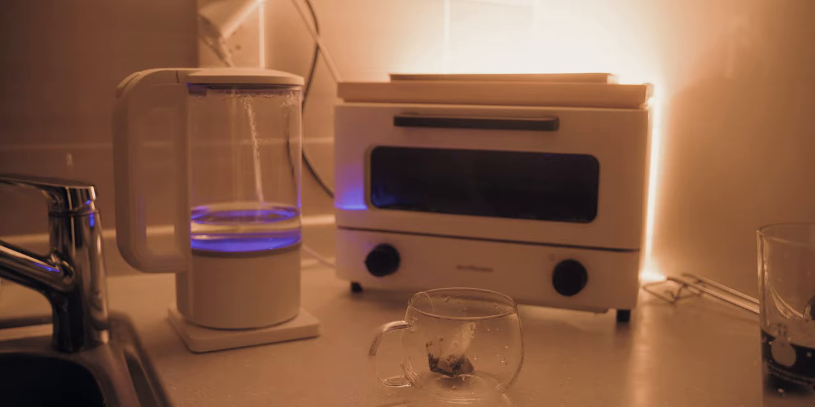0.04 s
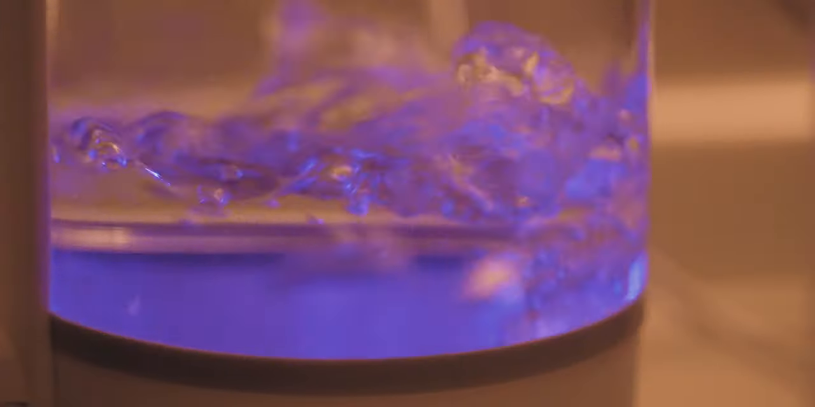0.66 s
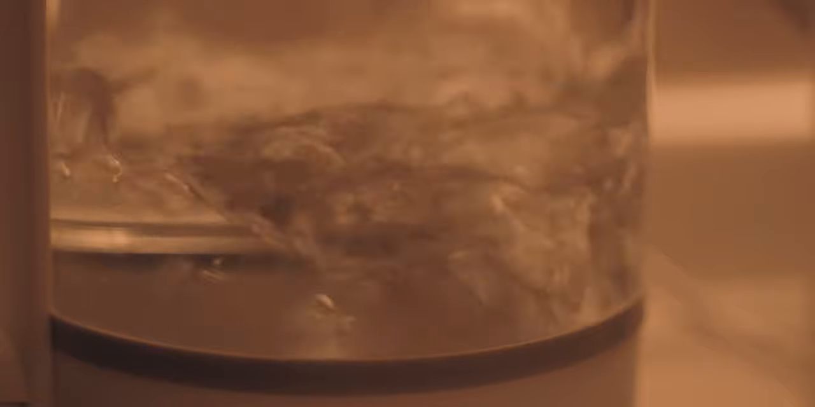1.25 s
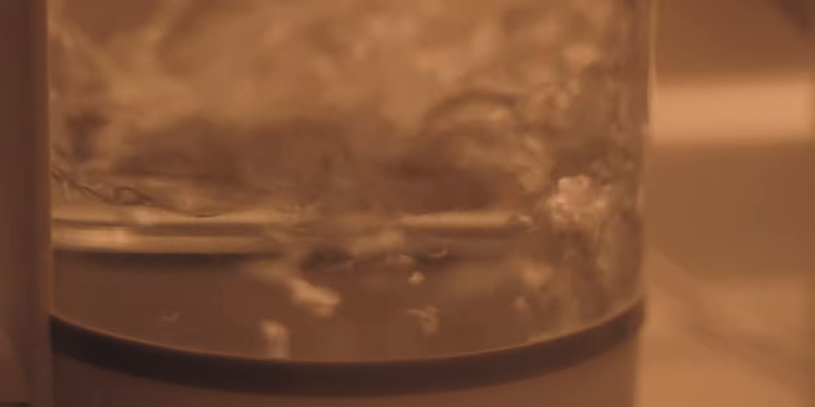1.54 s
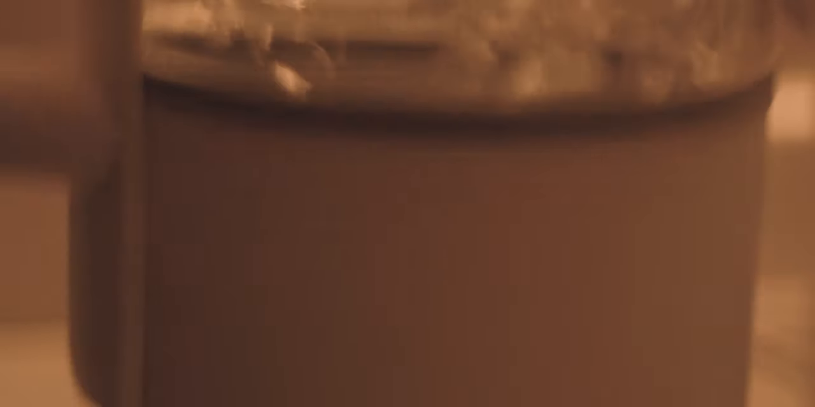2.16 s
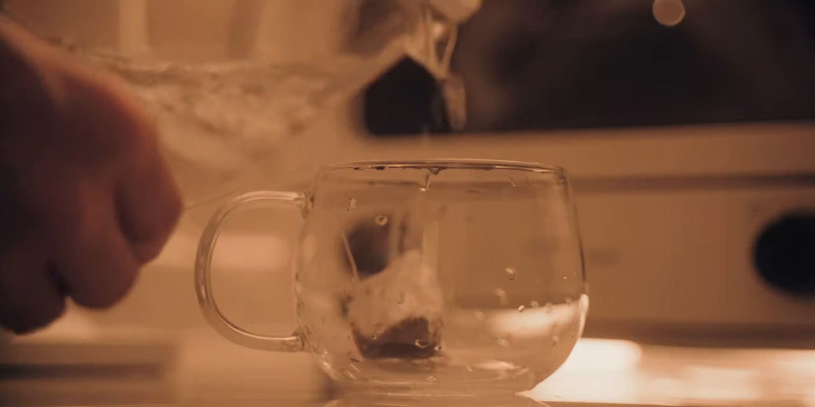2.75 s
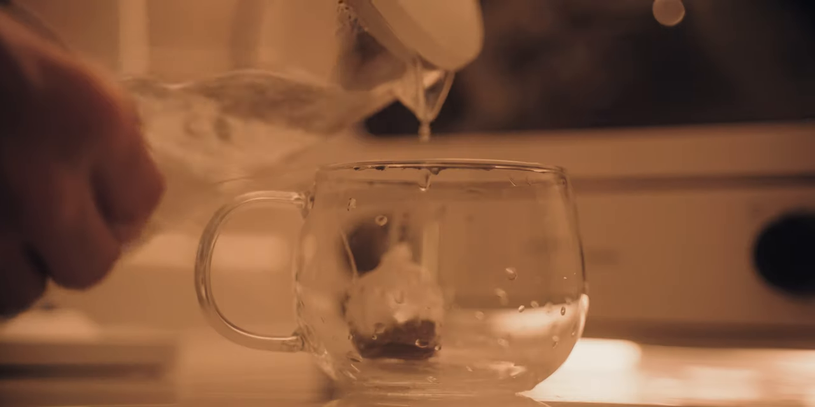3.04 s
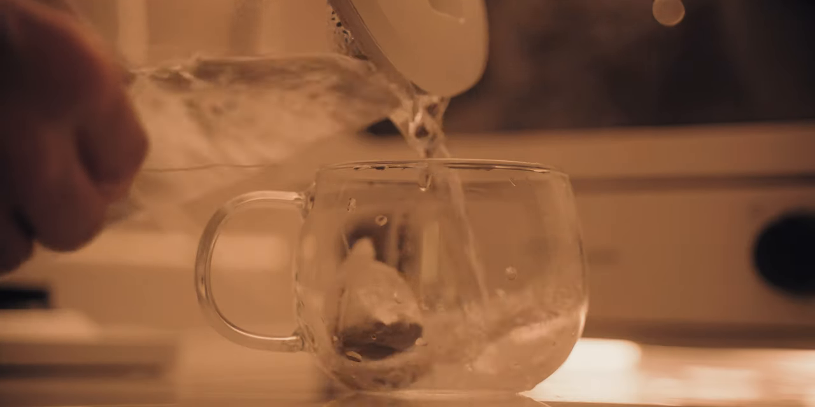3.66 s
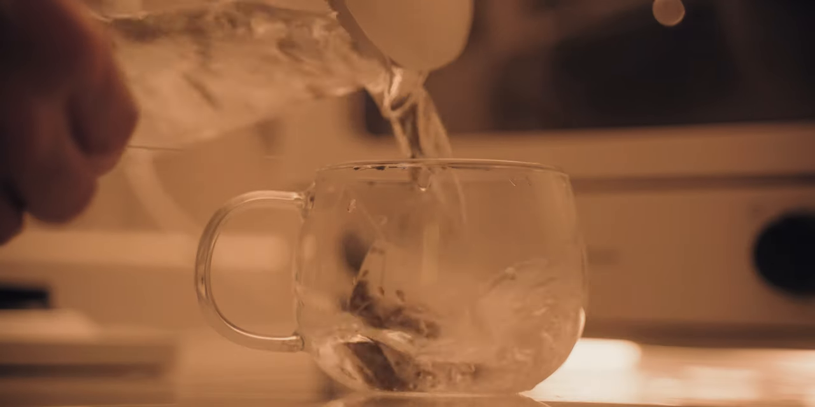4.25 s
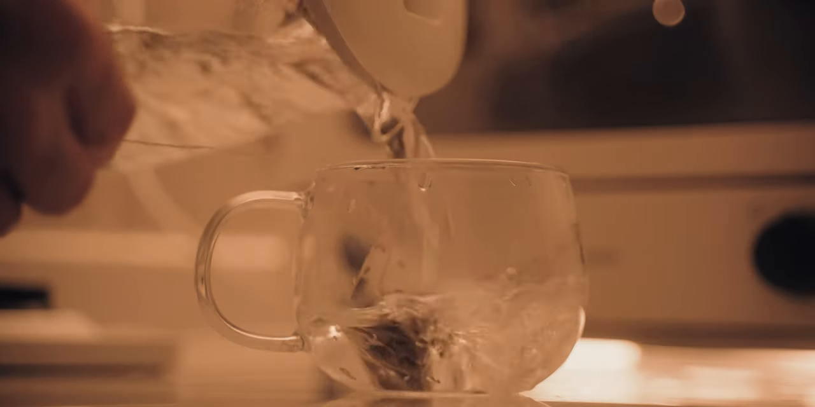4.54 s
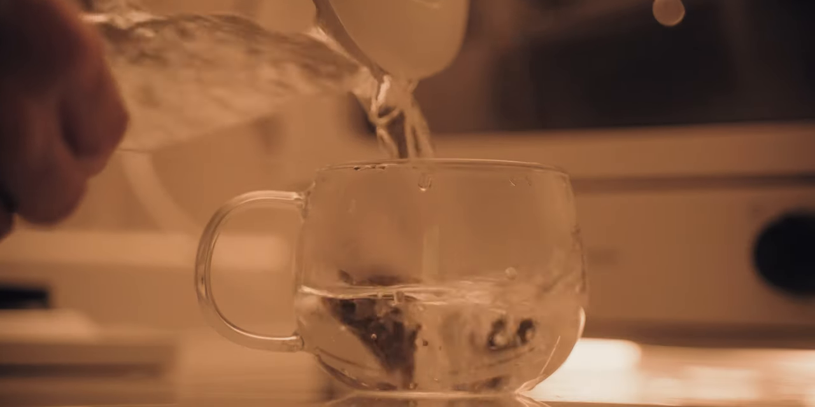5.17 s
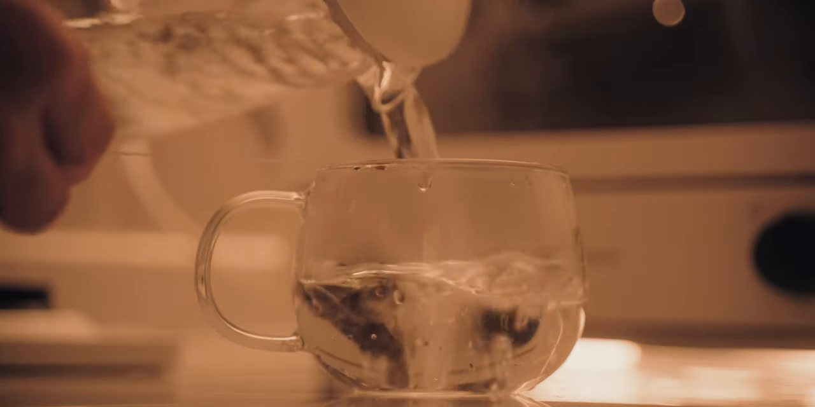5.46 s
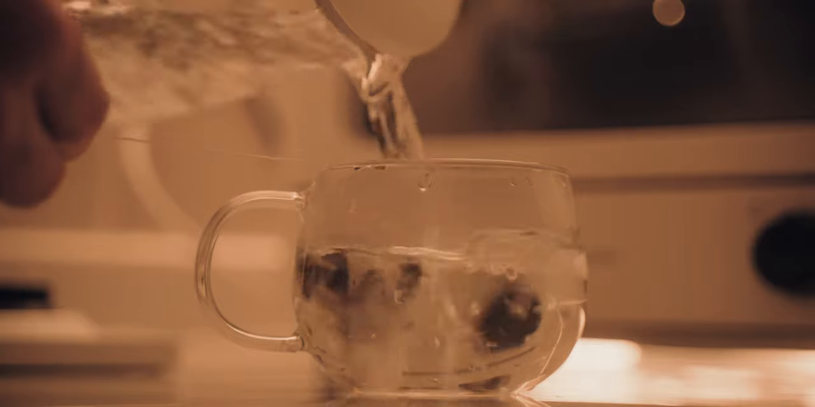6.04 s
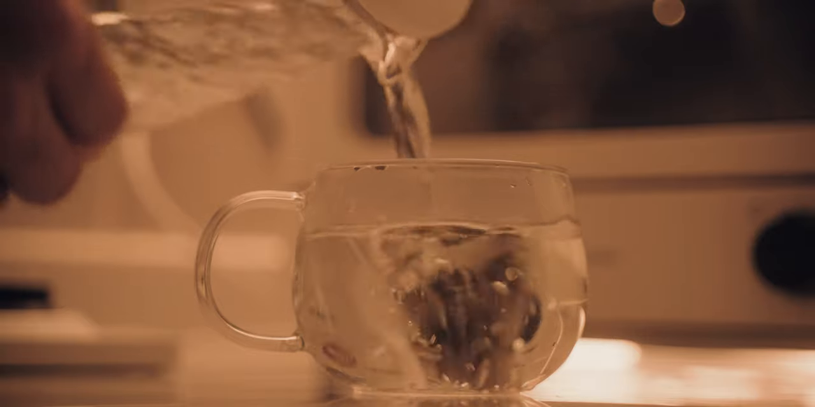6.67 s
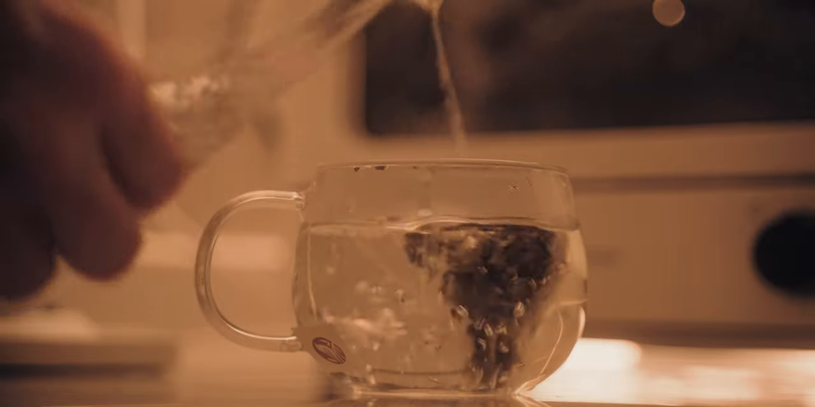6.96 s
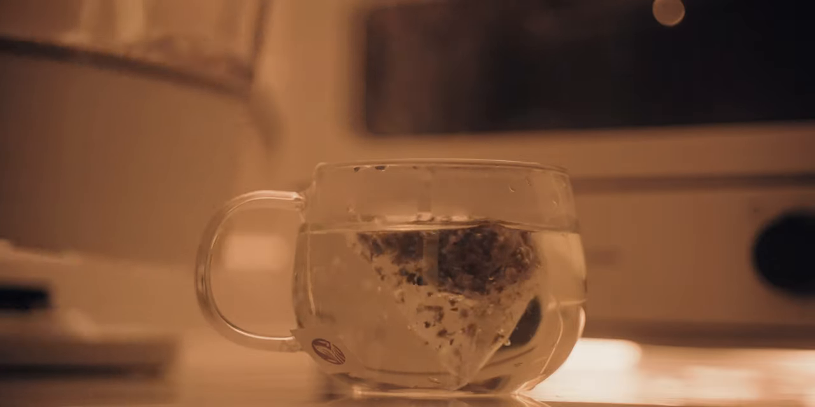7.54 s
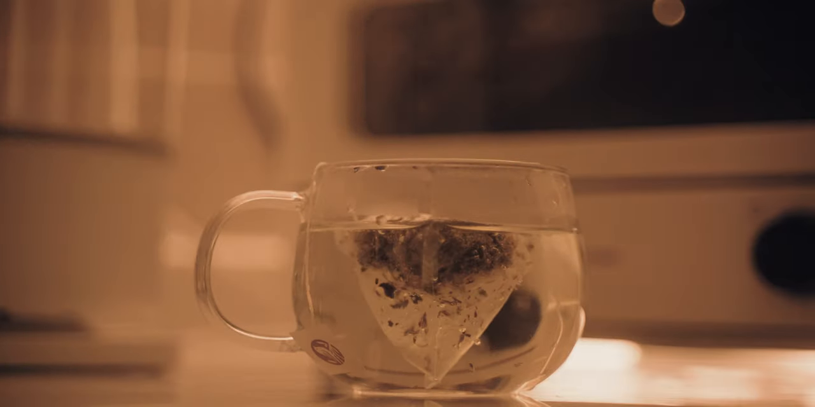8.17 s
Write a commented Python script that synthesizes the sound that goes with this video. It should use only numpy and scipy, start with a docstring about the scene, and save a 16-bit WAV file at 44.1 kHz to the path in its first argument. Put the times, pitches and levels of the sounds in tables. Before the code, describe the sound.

In a quiet kitchen, close to the microphone, a glass electric kettle simmers with a low rumble and a ticking hiss. Its switch snaps off sharply and it is lifted from the base. Louder now, water throbs and sizzles inside the tilted kettle, then splashes and gurgles into a glass cup, softening as it fills. After a last trickle and drips, the kettle clunks upright and is set down heavily on the counter.

```python
"""A quiet kitchen, in stereo, close to a glass electric kettle. Steam bubbles rumble and simmer,
the switch snaps off and the kettle is lifted from its base. After a cut, heard louder, it is tilted:
water sizzles and throbs on the hot plate, then splashes and gurgles into a glass cup, softer as the
pool deepens. The kettle swings upright with a clunk and is set down heavily on the counter."""
import sys
import numpy as np
from scipy import signal
from scipy.fft import rfft, irfft, next_fast_len
from scipy.io import wavfile
from scipy.ndimage import map_coordinates

SR = 44100
rng = np.random.default_rng(int(sys.argv[2]) if len(sys.argv) > 2 else 0)


def dump(signal):
    """Clip the signal to [-1, 1] and save it as 16-bit WAV at the path in sys.argv[1]."""
    limited = np.clip(np.atleast_2d(signal).T, -1, 1)
    pcm = np.round(limited * 32767).astype(np.int16)
    wavfile.write(sys.argv[1], SR, pcm)


N = 366471
TIME = np.arange(N) / SR
AGE = TIME[:SR // 2]  # seconds since a strike
LIFT_S, CUT_S, THROB_END_S, TRICKLE_S, STOP_S = 2.1, 2.596, 3.48, 6.68, 7.03
TOP_HZ = 15800


def amp(db):
    """Decibels to gain."""
    return 10 ** (np.asarray(db) / 20)


def unit(x):
    """Scale to rms 1."""
    return x / np.sqrt(np.mean(x ** 2) + 1e-20)


def along(points, hz):
    """Read (frequency, value) points on a log frequency axis."""
    freqs, values = np.transpose(points)
    return np.interp(np.log(hz + 1), np.log(freqs), values)


def wobble(rate):
    """A smooth random curve, rate knots a second."""
    return map_coordinates(rng.standard_normal(int(N * rate / SR) + 4), [TIME * rate])


def fade(t60):
    """A free decay, 60 dB in t60 seconds."""
    return amp(-60 * AGE / t60)


def since(s):
    """Seconds gone by since time s, zero before it."""
    return np.maximum(TIME - s, 0)


def held(start, stop, attack_s, t60):
    """Gain that rises, holds until stop and dies away."""
    return np.minimum(since(start) / attack_s, 1) * amp(-60 * since(stop) / t60)


def add(track, s, sound):
    """Mix a sound in at time s."""
    part = track[..., max(round(s * SR), 0):][..., :sound.shape[-1]]
    part += sound[..., :part.shape[-1]]


def filtered(x, response):
    """Pass x through a frequency response."""
    n = x.shape[-1]
    padded = next_fast_len(n + SR // 4)
    return irfft(rfft(x, padded) * response(np.fft.rfftfreq(padded, 1 / SR)), padded)[..., :n]


def resonances(modes, f):
    """Causal response of (pitch_hz, width_hz, gain_db) resonances."""
    return sum((-1) ** k * amp(db) * 1j * f * width / (hz * hz - f * f + 1j * f * width)
               for k, (hz, width, db) in enumerate(modes))


def noise(spectrum, size=N):
    """Mid and side noise of rms 1, shaped by (freq_hz, gain_db) points."""
    return unit(filtered(rng.standard_normal((2, size)), lambda f: amp(along(spectrum, f))))


def hum(modes):
    """Mid and side noise of rms 1 held in resonances."""
    return unit(filtered(rng.standard_normal((2, N)), lambda f: resonances(modes, f) ** 2))


def ring(modes):
    """Struck (pitch_hz, gain_db, t60_s) modes, at new strengths for every blow."""
    gains = amp(np.array(modes)[:, 1] + rng.normal(0, 1.7, len(modes)))
    partials = sum((-1) ** k * gains[k] * fade(t60) * np.sin(2 * np.pi * hz * AGE)
                   for k, (hz, _, t60) in enumerate(modes))
    return partials / np.linalg.norm(gains)


def pops(rate, spread_db):
    """Mid and side impulses at random times and places: many small, a few large."""
    chance, size, place = rng.random((3, N))
    hits = (chance < rate / SR) * amp(spread_db * np.minimum(-np.log(size + 1e-9), 4))
    return unit(np.array([hits, hits * (2 * place - 1)]))


def blips(rows, cycles, rise):
    """(start_s, level_db, pitch_hz) tones that swell over some cycles and die; rise bends the pitch up."""
    out = np.zeros((2, N))
    for s, db, hz in rows:
        swell = AGE[:SR // 6] * hz / cycles  # 1 at the peak
        phase = 2 * np.pi * cycles * (swell + rise * (swell - 2 * np.log1p(swell)))
        place = np.array([[1], [rng.uniform(-0.3, 0.47)]])
        add(out, s, amp(db) * swell * np.exp(1 - swell) * np.sin(phase) * place)
    return out


# Decay of the kitchen's reflections: freq_hz, t60_s
WALL_DECAY = [(100, 0.35), (1000, 0.36), (5000, 0.22), (15000, 0.31)]
def room(x, wet_db):
    """Add the reflections that reach the microphone from the walls, changing as things move."""
    out = x.copy()
    block = SR // 3
    for start in range(0, N, block):
        hz, t, bands = signal.stft(rng.standard_normal((2, SR // 2)), SR, nperseg=256)
        decay = amp(-60 * t / along(WALL_DECAY, hz)[:, None])
        tail = signal.istft(bands * decay, SR, nperseg=256)[1]
        tail = np.pad(tail / np.linalg.norm(tail[0]), ((0, 0), (SR // 400, 0)))  # 2.5 ms late
        add(out, start / SR, amp(wet_db) * signal.fftconvolve(x[:1, start:start + block], tail, axes=1))
    return out


# Room tone all around the microphone: freq_hz, gain_db
ROOM_TONE = [(25, -13), (85, 2.5), (140, -2), (254, 0.5), (315, -4), (720, -10), (1050, -13.5), (1270, -8),
             (1700, -12), (1900, -16.5), (2150, -16.5), (3200, -20), (4200, -21), (7000, -25), (15700, -32)]
def kitchen():
    """The quiet room: a low, gently wavering noise."""
    return amp(-47 + 0.9 * wobble(5.8)) * noise(ROOM_TONE)


def heater(pitch_hz=3300, count=14):
    """The heater sings a thin note and pings under bursting bubbles; the base rings at the lift."""
    singing = amp(-75 + 2.5 * wobble(30.1)) * held(0.12, LIFT_S, attack_s=0.06, t60=2.5)
    note = singing * hum([(pitch_hz, 280, 0)])
    pings = [(s, -63, pitch_hz) for s in rng.uniform(0.23, 1.3, count)]
    base = amp(-63) * held(LIFT_S, 2.17, attack_s=0.063, t60=0.9) * hum([(1670, 130, 0)])
    return note + blips(pings, cycles=10, rise=0) + base


# The kettle slides on its base, later the grip on the handle: start_s, length_s, level_db, brightest_hz
PLASTIC_RUBS = [(2.02, 0.053, -60, 2600), (7.78, .08, -55.5, 5500)]
def slides():
    """Short swishes of plastic rubbing."""
    out = np.zeros((2, N))
    for s, length, db, hz in PLASTIC_RUBS:
        rub = noise([(hz * 0.26, -17), (hz, 3), (hz * 2.4, -2), (hz * 4, -20)])
        out += amp(db) * held(s, s + length, attack_s=0.04, t60=0.2) * rub
    return out


# Small steam bubbles, heard beside the kettle: freq_hz, gain_db
SIMMER_SPECTRUM = [(300, -30), (450, 2), (620, -9.5), (820, -5.5), (1050, -9), (1400, -7), (2200, -10),
                   (4500, -14.5), (5800, -13.5), (9000, -18.5), (11000, -23), (15700, -27.5)]
def simmer():
    """Small steam bubbles burst in a ticking hiss."""
    bursts = room(pops(rate=160, spread_db=3.5), wet_db=4)
    ticks = unit(filtered(bursts, lambda f: amp(along(SIMMER_SPECTRUM, f))))
    flicker = amp(-61.5 + 1.3 * wobble(30.03))
    hiss = noise(SIMMER_SPECTRUM)
    ringing = hum([(1420, 240, 0), (2670, 220, -3)])
    return flicker * (0.67 * hiss + 0.64 * ticks + 0.28 * ringing)


# The low end of the boil: freq_hz, gain_db
RUMBLE_SPECTRUM = [(18, -43), (30, -18), (86, -7.5), (128, -1), (162, -5), (195, -18), (241, -3),
                   (282, -17), (387, -16.5), (430, -40), (504, -41), (700, -85), (910, -69), (1540, -120)]
def rumble(build_s=0.23, build_db=6.5, calm_db_per_s=11):
    """Big steam bubbles build up, hold, and calm once the kettle is lifted."""
    level_db = -50.5 - build_db * np.maximum(1 - TIME / build_s, 0) - calm_db_per_s * since(LIFT_S)
    return amp(level_db + 1.54 * wobble(16)) * noise(RUMBLE_SPECTRUM)


# Ringing of the glass jug and cup: pitch_hz, gain_db
GLASS_MODES = [(1280, -6), (1640, 3), (2050, 1), (2480, -10.5), (2840, -2), (3310, -7), (4190, -5)]
def water(spectrum, rate, spread_db, hollow_db, width_hz, wash):
    """Countless tiny bursts over a wash of spray, coloured by the glass around them."""
    def glass(f):
        peaks = sum(amp(hollow_db + db) / (1 + (2 * (f - hz) / width_hz) ** 2) for hz, db in GLASS_MODES)
        return np.sqrt(1 + peaks)
    grains = unit(room(pops(rate, spread_db), wet_db=1.5)) + wash * rng.standard_normal((2, N))
    return unit(filtered(grains, lambda f: amp(along(spectrum, f)) * glass(f)))


def swash():
    """Water washes against the glass as the kettle is lifted."""
    lapping = water(SPLASH_SPECTRUM, rate=220, spread_db=4.5, hollow_db=12, width_hz=60, wash=0.3)
    return amp(-66) * held(LIFT_S, 2.35, attack_s=0.06, t60=2.8) * lapping


# Water shifts as the jug tilts: start_s, length_s, level_db, pitch_hz
TILTS = [(2.58, .6, -48, 118), (3.674, .15, -45.5, 113), (6.68, 0.2, -49.5, 89)]
def sloshing():
    """Water sways in the jug as a low band of noise, and swells at each tilt."""
    def sway(hz):
        return noise([(hz * 0.61, -25), (hz * 0.86, -10.5), (hz, 1), (hz * 1.15, -15),
                      (hz * 2.7, -40), (1000, -90)])
    swells = sum(amp(db) * held(s, s + length, attack_s=0.04, t60=1.2) * sway(hz)
                 for s, length, db, hz in TILTS)
    return swells + amp(-57.5) * sway(116)


# Resonances of the air in the jug: pitch_hz, width_hz, gain_db
AIR_MODES = [(183, 41, -24), (257.3, 13.2, 3.5), (372, 100, -19.5)]
def jug_air(fade_db_per_s=0.5):
    """Collapsing steam stirs the air in the tilted jug, which then hums on, ever fainter."""
    white = rng.standard_normal((2, N))
    air = unit(filtered(white, lambda f: resonances(AIR_MODES, f) / (1 + (f / 500) ** 4)))
    steam = amp(-41) * held(CUT_S, THROB_END_S, attack_s=0.0031, t60=0.21)
    flow = amp(-50 - fade_db_per_s * since(THROB_END_S)) * held(CUT_S, 6.32, attack_s=0.3, t60=5.3)
    return np.hypot(steam, flow) * air


# The largest steam pockets: start_s, level_db
STEAM_POCKETS = [(2.694, -28), (2.714, -26.5), (2.828, -27), (2.871, -30.5), (2.987, -25.5), (3.013, -26.5),
                 (3.121, -26.5), (3.209, -24.5), (3.299, -28.5), (3.464, -28.5)]
def throbs(pitch_hz=245, count=12):
    """Steam pockets collapse on the hot plate and throb at the pitch of the air in the jug."""
    large = [(s, db, pitch_hz * np.exp(0.055 * rng.standard_normal())) for s, db in STEAM_POCKETS]
    small = [(s, -34, pitch_hz * np.exp(0.12 * rng.standard_normal()))
             for s in rng.uniform(CUT_S, THROB_END_S, count)]
    return room(blips(large + small, cycles=1.33, rise=0.017), wet_db=-15)


# Switch, base and handle click, close and fairly dry: start_s, level_db, highpass_hz
PLASTIC_CLICKS = [(0.531, -44, 3000), (.8312, -16.5, 4000), (0.8361, -13.5, 1000), (0.8379, -19, 1400),
                  (1.512, -39, 6000), (1.841, -46.5, 700), (2.0748, -40.5, 1800), (2.0815, -46, 1500),
                  (6.94, -38.5, 9000), (7.194, -31.5, 12000), (8.021, -35, 9000)]
# Resonances of the switch housing: pitch_hz, width_hz, gain_db
HOUSING_MODES = [(630, 45, 4), (1340, 80, 4.5), (1510, 63, -3), (1930, 110, -1.5), (2500, 51, -13),
                 (2800, 90, -14), (3900, 130, -3), (4240, 130, -9), (4840, 87, -3), (5610, 130, -0.5),
                 (6130, 170, -4), (7800, 890, -11)]
# The crack of hard plastic: freq_hz, gain_db
CRACK_SPECTRUM = [(300, -18), (480, -4), (660, 0.5), (1080, -11), (1330, 7), (1650, -4), (1970, 2.5),
                  (2300, -3), (3200, -6.5), (4300, -5), (6000, -8.5), (7000, -13.5), (10000, -15.5),
                  (15700, -26)]
def clicks():
    """Hard plastic snaps: a crack, then the rattling ring of the housing."""
    out = np.zeros((2, N))
    for s, db, highpass_hz in PLASTIC_CLICKS:
        housing = unit(filtered(rng.standard_normal((2, len(AGE))), lambda f: resonances(HOUSING_MODES, f)))
        rattle = housing * (0.25 * fade(0.026) + 0.089 * fade(0.31))
        crack = 0.5 * noise(CRACK_SPECTRUM, size=len(AGE)) * (fade(0.036) + 0.31 * fade(0.19))
        highpass = signal.butter(1, highpass_hz, "high", fs=SR)
        add(out, s, amp(db) * signal.lfilter(*highpass, crack + rattle))
    return room(out, wet_db=-12.5)


# The kettle is lifted, righted and set down: start_s, clunk_db, thump_db, highpass_hz, lowpass_hz
BUMPS = [(2.074, -33.5, -64, 2600, 3300), (2.092, -33.5, -53, 328, 397), (7.261, -17, -53, 900, 1290),
         (7.266, -25.5, -33.5, 790, 1200), (8.0215, -24.5, -44, 1010, 1680), (8.133, -17, -17.5, 400, 3400),
         (8.147, -21.5, -19.5, 300, 2200), (8.161, -29, -23, 200, 2000), (8.207, -18, -31, 600, 800),
         (8.304, -26.5, -16.5, 100, 3620)]
# The noise of each contact: freq_hz, gain_db
CLUNK_SPECTRUM = [(100, -36), (250, 17), (450, 1), (750, 4), (1100, -1.5), (1800, 0), (4000, -8),
                  (8000, -13.5), (15000, -6.5)]
# Ringing of the kettle body: pitch_hz, gain_db, t60_s
BODY_MODES = [(529, 1, 0.48), (660, 2, 0.13), (1006, -0.5, 0.4), (1114, -2, 0.28), (1380, 3, 0.1),
              (1462, 5.5, 0.17), (1710, -5, 0.45), (2159, -6, 0.52), (2340, -32, 0.61), (3420, -11, 0.55),
              (4070, -27, 0.19)]
# Boom of the counter under it: pitch_hz, gain_db, t60_s
COUNTER_MODES = [(48.2, 0, 0.28), (59.5, -6, 0.17), (86.5, -12, .2), (100, 2.5, 0.39), (127.3, -5.5, 0.28),
                 (175, -5, 0.13), (274, -5, 0.14)]
# The foot squeaks as the kettle settles: start_s, level_db, pitch_hz
FOOT_SQUEAKS = [(8.290, -36, 3180), (8.303, -36, 1770), (8.305, -25, 2280)]
def knocks():
    """The kettle clunks, each contact with its own brightness, and its weight thumps below."""
    out = np.zeros((2, N))
    for s, clunk_db, thump_db, highpass_hz, lowpass_hz in BUMPS:
        clunk = 0.8 * noise(CLUNK_SPECTRUM, size=len(AGE)) * fade(0.062) + 0.15 * ring(BODY_MODES)
        clunk = signal.lfilter(*signal.butter(1, highpass_hz, "high", fs=SR), clunk)
        clunk = signal.lfilter(*signal.butter(2, lowpass_hz, fs=SR), clunk)
        add(out, s, amp(clunk_db) * clunk)
        add(out, s, amp(thump_db) * ring(COUNTER_MODES) * (1 - fade(0.013)))
    base_boom = blips([(2.087, -41.5, 381)], cycles=2.0, rise=0)  # as the kettle comes off
    squeaks = blips(FOOT_SQUEAKS, cycles=6.8, rise=0.03)
    return room(out + base_boom + squeaks, wet_db=-3.0)


# The last drips into the cup: start_s, level_db, pitch_hz
LAST_DRIPS = [(7.036, -47, 3350), (7.135, -48.5, 3580), (7.26, -53, 3580), (7.385, -49, 3560)]
def drips():
    """The glass cup tinkles under each drip."""
    return room(blips(LAST_DRIPS, cycles=13, rise=0), wet_db=-11)


# The largest air bubbles trapped by the stream: start_s, level_db, pitch_hz
LARGE_BUBBLES = [(4.279, -38, 1100), (4.459, -33.5, 1130), (4.492, -30.5, 1060), (4.524, -39, 1250),
                 (4.785, -39, 1160), (4.819, -37, 1140), (5.046, -35, 674), (5.065, -40, 730),
                 (5.242, -33.5, 677), (5.974, -40, 675), (6.749, -37, 1390)]
def gurgle(count=130):
    """Trapped bubbles ring in the cup, a few large among many small; the large ones churn the water."""
    when, size, pitch = rng.random((count, 3)).T
    start_s = THROB_END_S + (TRICKLE_S - THROB_END_S) * when
    small = np.transpose([start_s, -55 + 14 * size ** 3, 800 * 2 ** (1.8 * pitch)])
    out = blips(LARGE_BUBBLES, cycles=1.3, rise=0.02) + blips(small, cycles=1.7, rise=0.06)
    for s, db, hz in LARGE_BUBBLES:
        churn = noise([(hz / 3, -30), (hz * 0.62, -2), (hz * 0.95, -2), (hz * 3, -30)], size=SR // 8)
        add(out, s, amp(db) * 0.23 * fade(0.14)[:SR // 8] * churn)
    return room(out, wet_db=-5)


# The loudest drops on the water and the glass: start_s, level_db
LOUD_DROPS = [(2.9806, -31.5), (3.2241, -37), (3.7910, -34.5), (3.8969, -36), (4.1599, -38), (4.4128, -31),
              (4.4932, -33), (4.6094, -45), (4.81, -36), (5.2934, -39.5), (5.3966, -37), (5.4979, -40),
              (5.667, -40.5), (5.756, -40.5), (5.9248, -39), (6.2078, -38.5), (6.5656, -40.5),
              (6.9224, -40.5), (7.0334, -46), (7.2325, -39), (7.6884, -41)]
# The spit of one bursting drop: freq_hz, gain_db
SPIT_SPECTRUM = [(600, -18), (1400, 10.5), (2100, 13), (2700, 4.5), (3400, 3.5), (4300, 9.5), (5000, 0),
                 (8000, -5), (15000, -26)]
def spatter(count=120, spread_db=8, fade_db_per_s=1.15, breakup_db=3.5):
    """Each drop bursts in a short, ragged spit: a sharp start, a tiny bubble and a spray of fragments."""
    out = np.zeros((2, N))
    when, size = rng.random((count, 2)).T
    elapsed = (STOP_S - CUT_S) * (np.arange(count) + when) / count
    # stray drops soften as the cup fills, and grow louder again as the stream breaks up
    level_db = -45.5 - fade_db_per_s * elapsed + breakup_db * (CUT_S + elapsed > TRICKLE_S)
    stray = np.transpose([CUT_S + elapsed, level_db + spread_db * size ** 2])
    drops = np.vstack([LOUD_DROPS, stray])
    decay = 0.24 * fade(0.01) + 0.54 * fade(0.058)
    for s, db in drops:
        add(out, s, amp(db) * decay[:SR // 10] * noise(SPIT_SPECTRUM, size=SR // 10))
    pitch_hz = 3600 * np.exp(0.223 * rng.standard_normal(len(drops)))
    bubbles = blips(np.column_stack([drops, pitch_hz]), cycles=5.2, rise=0.013)
    return room(out + 0.42 * bubbles, wet_db=-4.5)


# Water splashing on glass, near the microphone: freq_hz, gain_db
SPLASH_SPECTRUM = [(180, -54), (300, -0.5), (560, 0.5), (684, 1.5), (855, -3.5), (1130, -9), (1500, -5),
                   (2090, -5.5), (2410, -7), (3600, -10.5), (4190, -9.5), (5000, -9.5), (6500, -15),
                   (11000, -120)]
# The sizzle of fine spray: freq_hz, gain_db
SIZZLE_SPECTRUM = [(1500, -22), (3300, -21.5), (4300, -0.5), (6000, 0), (7000, -4), (9000, -2),
                   (11000, -11.5), (15700, -12.5)]
# The thin stream at the end of the pour: freq_hz, gain_db
TRICKLE_SPECTRUM = [(400, -25), (900, -8), (1300, 0), (1700, -6), (2100, 0), (2800, -9), (3600, 1),
                    (4300, -7), (5200, -8), (12000, -18)]
def pour(covered_s=4.4, cover_db=2.5, deepen_db_per_s=6):
    """The stream hits bare glass until a deepening pool cushions it; a last trickle rings the cup."""
    splash = water(SPLASH_SPECTRUM, rate=500, spread_db=4.0, hollow_db=18, width_hz=57, wash=0.33)
    sizzle = water(SIZZLE_SPECTRUM, rate=500, spread_db=5.0, hollow_db=11, width_hz=60, wash=0.31)
    trickle = water(TRICKLE_SPECTRUM, rate=123, spread_db=3, hollow_db=22, width_hz=35, wash=0.15)
    pool_age = since(covered_s)
    cushion_db = cover_db * np.minimum(pool_age / 0.059, 1) + deepen_db_per_s * pool_age
    flow = amp(-cushion_db) * held(CUT_S, STOP_S, attack_s=0.0025, t60=0.6)
    escape_db = 0.24 * cushion_db  # fine spray escapes part of the cushioning
    stream = flow * (amp(-49) * splash + amp(-57 + escape_db) * sizzle)
    ending = amp(-57.5) * held(TRICKLE_S, STOP_S, attack_s=0.17, t60=2.7) * trickle
    surge_db = wobble(18) + 1.8 * wobble(60)
    return amp(surge_db) * (stream + ending)


# Stereo width at the microphone, bass nearly mono and treble wide: freq_hz, side_db
STEREO_WIDTH = [(30, -42), (60, -36), (200, -26), (380, -12), (700, -6), (1300, -5.5), (2400, -2),
                (4400, -1.5), (8000, -1), (15000, 0)]
def scene():
    """The boil, a cut to the pour, and handling noises over both; mid and side become left and right."""
    cut = np.clip((TIME - CUT_S) / 0.003, 0, 1)
    pouring = kitchen() + drips() + jug_air() + throbs() + sloshing() + pour() + gurgle() + spatter()
    boiling = rumble() + simmer() + swash() + heater()
    mid, side = (1 - cut) * boiling + cut * pouring + slides() + clicks() + knocks()
    side = filtered(side, lambda f: amp(along(STEREO_WIDTH, f)))
    return np.array([mid + side, mid - side])


def record(dry):
    """The recorder keeps nothing above its band limit."""
    return filtered(dry, lambda f: f < TOP_HZ)


dry = scene()
out = record(dry)
dump(out)
```